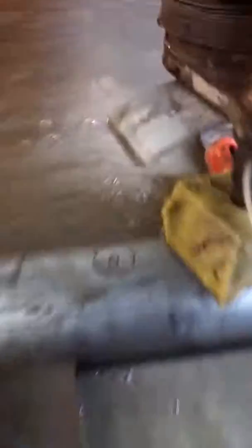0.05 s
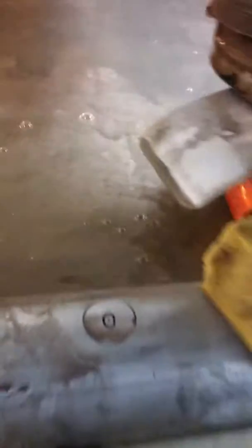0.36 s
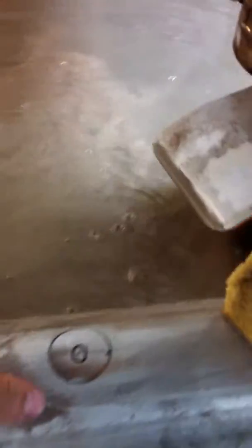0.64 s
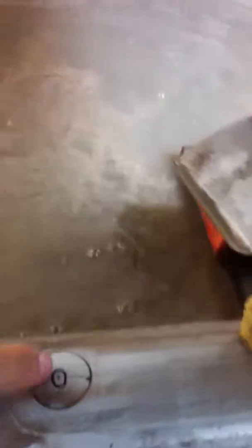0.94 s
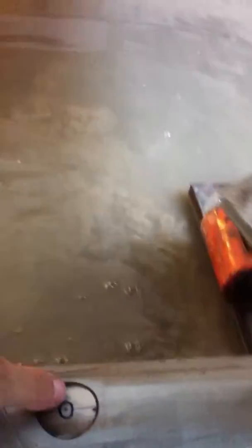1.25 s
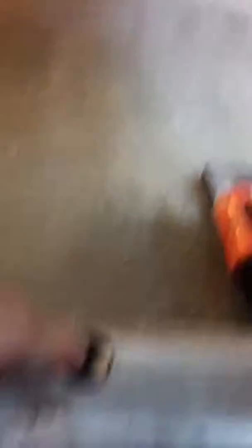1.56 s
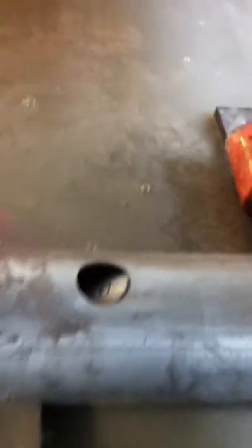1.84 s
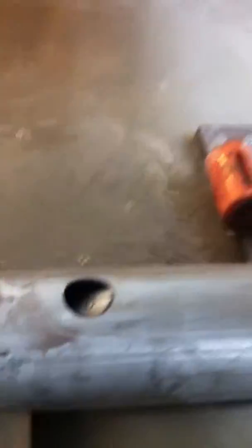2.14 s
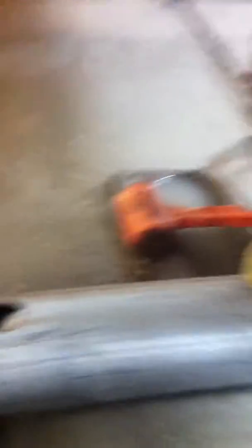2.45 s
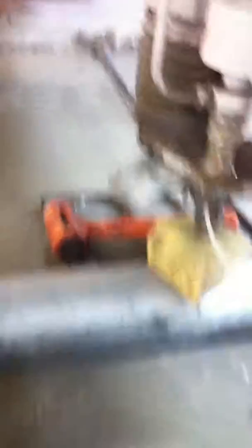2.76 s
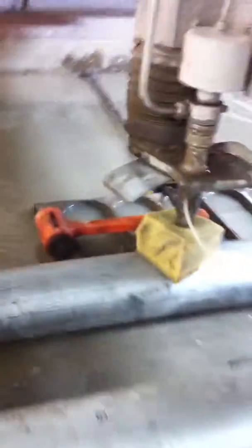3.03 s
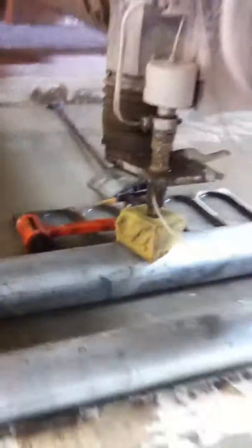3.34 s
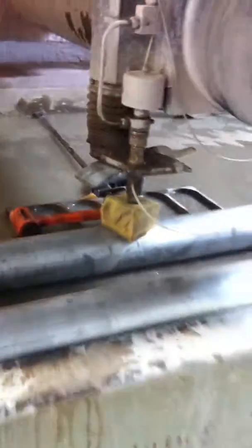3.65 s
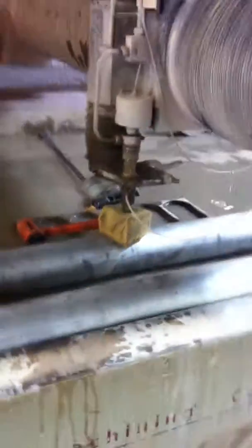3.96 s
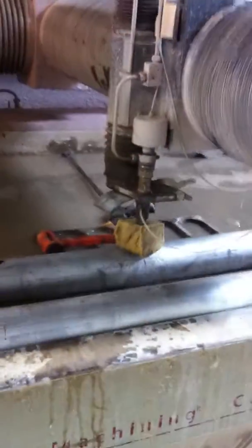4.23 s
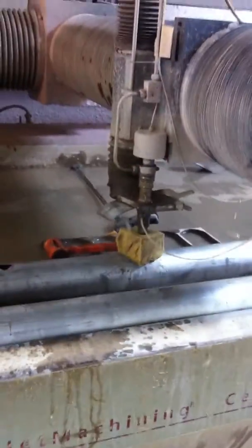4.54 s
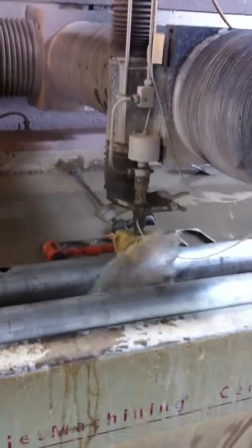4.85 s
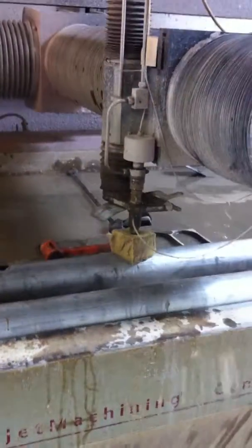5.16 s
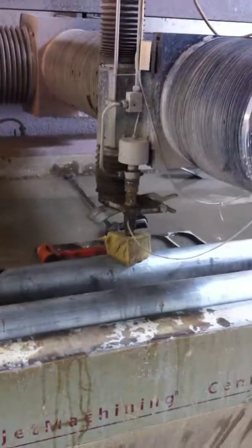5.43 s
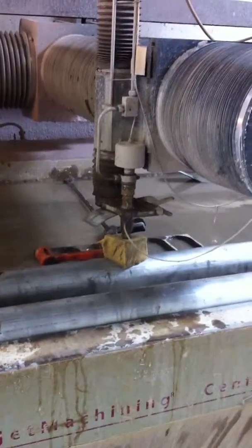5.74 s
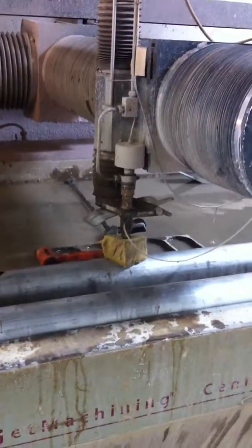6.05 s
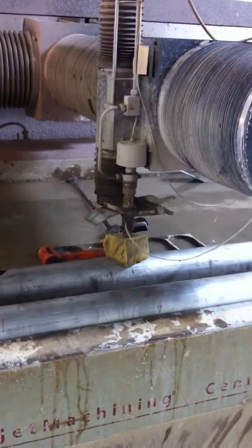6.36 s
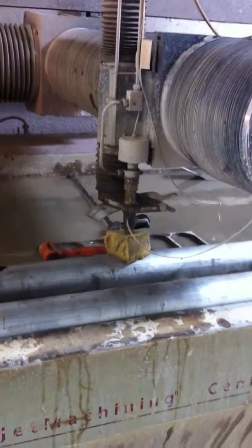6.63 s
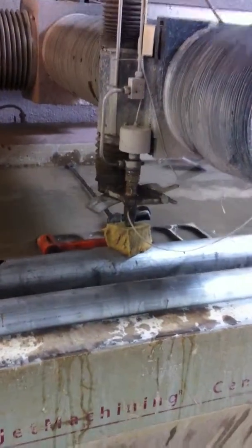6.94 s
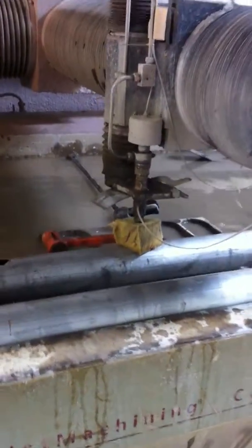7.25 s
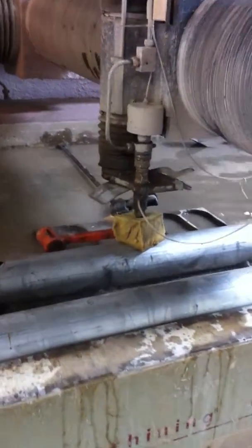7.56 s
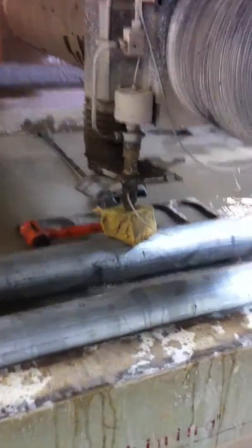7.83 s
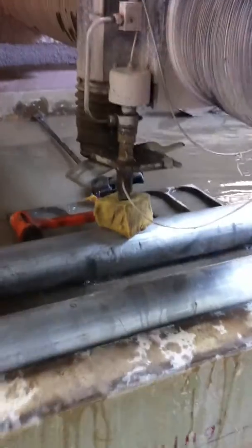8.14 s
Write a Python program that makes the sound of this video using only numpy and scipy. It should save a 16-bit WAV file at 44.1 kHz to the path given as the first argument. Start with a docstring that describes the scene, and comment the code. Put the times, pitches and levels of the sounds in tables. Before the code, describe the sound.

A high-pressure pump drones with a wavering whine over workshop rumble and a thin hiss of air. About halfway through, a water jet starts with a sharp spit and a low gulp from the tank. It hisses brightly on a steel tube, breaks through with a splashy rush and keeps cutting, with shifting whistles, hollow ringing and crackling spits. The microphone moves about close to the machine.

```python
"""A workshop with a waterjet table, heard from a hand-held microphone that moves about in front of it.
The high-pressure pump drones and whines over a bed of shop rumble and air. Then the valve opens: the
jet hisses on a steel tube, pierces its wall, churns the tank below and cuts on, spitting into the
hollow tube, which rings. An automatic gain control ducks the whole mix under the jet."""
import sys
import numpy as np
from scipy import signal
from scipy.fft import rfft, irfft, next_fast_len
from scipy.io import wavfile
from scipy.ndimage import uniform_filter1d

SR = 44100
rng = np.random.default_rng(int(sys.argv[2]) if len(sys.argv) > 2 else 0)


def digitize_waveform(pressure):
    """Quantize a signal to 16-bit integers and store it at the path in sys.argv[1].

    Rows of a 2-D input are taken as channels; values are limited to [-1, 1].
    """
    field = np.atleast_2d(pressure).T
    bounded = np.clip(field, -1, 1)
    quanta = np.round(bounded * 32767).astype(np.int16)
    wavfile.write(sys.argv[1], SR, quanta)


N = 366030

SHAFT_HZ = 33.64
VALVE_S, STRIKE_S, PIERCE_S = 4.258, 4.29, 4.852  # cues: valve opens, jet hits steel, wall gives way
LOUD_SPOT_WIDTH_S = 0.67  # the microphone crosses a spot where the machine tones pile up in the room


def from_db(db):
    """Decibels to gain."""
    return 10 ** (np.asarray(db) / 20)


def rms_one(x):
    """Scale to an rms of 1."""
    return x / np.sqrt(np.mean(np.abs(x) ** 2) + 1e-20)


def seconds():
    """The time of every sample."""
    return np.arange(N) / SR


def automation(rows):
    """Breakpoints (t/s, values...) to one curve per value column."""
    times, *columns = np.transpose(rows)
    return [np.interp(seconds(), times, column) for column in columns]


def swell(at_s, width_s):
    """A bell-shaped envelope around a moment; the width is its standard deviation."""
    return np.exp(-.5 * ((seconds() - at_s) / width_s) ** 2)


def dying(from_s, decay_s):
    """Full until a moment, then an exponential decay."""
    return np.exp(-np.maximum(seconds() - from_s, 0) / decay_s)


def drift(rate_hz):
    """Smooth random modulation with a spread of 1."""
    step, run_in = 40, 2000
    pole = np.exp(-2 * np.pi * rate_hz * step / SR)
    white = rng.standard_normal(N // step + run_in + 2)
    slow = signal.lfilter([1], [1, -2 * pole, pole * pole], white)[run_in:]
    return np.interp(np.arange(N) / step, np.arange(len(slow)), rms_one(slow))


def sputter(spread_db):
    """The quick flutter of a turbulent flow, as a gain."""
    return from_db(spread_db * drift(28))


def at_hz(spectrum, hz):
    """Read a spectrum (f/Hz, level/dB) on a log-frequency axis."""
    known_hz, db = np.transpose(spectrum)
    return np.interp(np.log(np.maximum(hz, 1)), np.log(known_hz), db)


def noise(spectrum):
    """Steady noise of a given colour, rms 1."""
    size = next_fast_len(N)
    colour = from_db(at_hz(spectrum, np.arange(size // 2 + 1) * SR / size))
    return rms_one(irfft(rfft(rng.standard_normal(size)) * colour, size)[:N])


def resonance(hz, width_hz):
    """A resonance excited by turbulence, rms 1."""
    r = np.exp(-np.pi * width_hz / SR)
    poles = [1, -2 * r * np.cos(2 * np.pi * hz / SR), r * r]
    return rms_one(signal.lfilter([1, 0, -1], poles, rng.standard_normal(N)))


def whistle(hz, width_hz):
    """Turbulence through the same resonance twice, for steep skirts; rms 1."""
    r = np.exp(-1.55 * np.pi * width_hz / SR)
    section = [1, 0, -1, 1, -2 * r * np.cos(2 * np.pi * hz / SR), r * r]
    return rms_one(signal.sosfilt([section, section], rng.standard_normal(N)))


def room_tone(cycles, diffuse=0.4):
    """A steady direct tone plus reflections that fade in and out as the listener moves; rms about 1."""
    angle = 2 * np.pi * (cycles + rng.random())
    in_phase = (np.sqrt(2) + diffuse * drift(1.3)) * np.cos(angle)
    return in_phase + diffuse * drift(1.3) * np.sin(angle)


def shop(rumble_db=-35.0, air_db=-43.5, air_rise_db_per_s=0.63):
    """The bed: reverberant machine rumble, a thin, growing hiss of air and a small leak's sizzle."""
    # noise colours: f/Hz, level/dB
    rumble_colour = [(20, -43), (55, -35), (85, -20), (110, -6), (165, 1), (215, 7), (255, -1), (295, -0.5),
                     (360, -7.5), (490, 1.5), (580, -0.5), (700, 0), (1000, -2.5), (1400, -2), (1800, -8),
                     (2600, -22)]
    air_colour = [(1200, -11), (2200, 5), (2450, 3.5), (2700, 6), (2900, 4.5), (3150, 6), (3600, 6.5),
                  (4000, 2.5), (4470, 6), (5000, 1), (5300, 3.5), (5850, 0), (6500, 2), (6950, 4),
                  (7500, 1), (8800, 2), (10000, -7), (12500, -9), (14500, -31), (15400, -27), (17000, -29)]
    leak = from_db(-6.0 + 2.0 * drift(6.7)) * resonance(hz=8730, width_hz=920)
    air = sputter(spread_db=0.6) * noise(air_colour) + leak
    air_gain = from_db(air_db + air_rise_db_per_s * seconds())
    return from_db(rumble_db) * noise(rumble_colour) + air_gain * air


def motor():
    """A second motor whose lowest tone beats against the pump."""
    # motor tones: f/Hz
    tones = [272, 817, 1234, 1635]
    # each peaks at its own place in the loud spot: level/dB, boost/dB, t/s
    levels = [(-47, 5.5, 3.56), (-57, 12.5, 3.4), (-53.5, 9, 2.9), (-55.5, 1, 2.5)]
    out = 0
    for hz, (db, boost_db, at_s) in zip(tones, levels):
        gain = from_db(db + boost_db * swell(at_s, LOUD_SPOT_WIDTH_S))
        out += gain * room_tone(hz * seconds(), diffuse=0.11)
    return out


def plunger_hum(turns, base_db=-43.5, sixth_db=-47.5):
    """The drone of the plunger strokes; order 6 stands in the room and swells twice along the walk."""
    # strong orders: multiple of the shaft rate, level/dB
    orders = [(2, -31), (3, -18.5), (5, -12), (6, 1), (8, -6), (9, -5.5), (16, -7.5), (19, -5.5), (20, -9)]
    standing_db = sixth_db + 7.5 * swell(3.2, LOUD_SPOT_WIDTH_S) + 6.4 * swell(6.3, 0.85)
    return sum(from_db(db + (standing_db if order == 6 else base_db)) * room_tone(order * turns)
               for order, db in orders)


def drive_whine(turns):
    """The drive's speed wobbles on each turn, giving its whine opposed sidebands; reverb adds a wash."""
    # lower sideband, whine, upper sideband: multiples of the shaft rate
    orders = [39, 40, 41]
    # their balance along the walk: t/s, lower/dB, whine/dB, upper/dB, wash/dB
    walk = [(0, -53, -54, -58, -58), (.33, -39.5, -43, -45, -43), (.8, -37, -41, -47, -49),
            (1.3, -41.5, -44.5, -50, -45), (1.9, -53, -43, -41.5, -43), (2.35, -40, -46, -55, -50),
            (2.62, -51, -47, -56, -51), (2.85, -54, -44, -50, -41), (3.3, -55, -52, -54, -40),
            (4.2, -51, -44, -51, -45), (6.0, -60, -59, -56, -56), (8.3, -30, -43, -42, -37)]
    *lines_db, wash_db = automation(walk)
    lines = sum(sign * from_db(db) * np.cos(2 * np.pi * order * turns)
                for order, sign, db in zip(orders, (-1, 1, 1), lines_db))
    return np.sqrt(2) * lines + from_db(wash_db) * resonance(hz=1357, width_hz=88)


def casing_rattle(turns, size=4096):
    """The same rattle on every turn of the shaft; two paths through the room trade places slowly."""
    # envelope of the weak orders that shake the casing: f/Hz, level/dB
    colour = [(130, -65.5), (400, -56), (600, -65), (900, -58), (1250, -59), (1500, -84), (2000, -62)]
    orders = np.arange(4, 60)
    gains = from_db(at_hz(colour, orders * SHAFT_HZ))
    out, blend = 0, drift(0.43)
    for weight in (np.cos(blend), np.sin(blend)):
        lines = np.zeros(size // 2 + 1, complex)
        lines[orders] = gains * np.exp(2j * np.pi * rng.random(len(orders)))
        one_turn = irfft(lines) * size / np.sqrt(2)
        out += weight * np.interp(turns % 1, np.arange(size) / size, one_turn)
    return out


def pump():
    """Hum, whine and rattle, all locked to one slightly unsteady shaft."""
    turns = np.cumsum(SHAFT_HZ * (1 + .0004 * drift(1.5))) / SR
    return plunger_hum(turns) + drive_whine(turns) + casing_rattle(turns)


def tank(trim_db=2.5):
    """The jet drives air under water and the tank gulps in short, low swells."""
    # gulps: t/s, width/s, level/dB
    gulps = [(4.29, 0.0058, -33), (4.395, 0.025, -18), (4.902, 0.027, -36), (4.984, 0.034, -37),
             (5.3, 0.17, -44.5), (5.362, .01, -36)]
    # churning water: f/Hz, level/dB
    colour = [(25, -34), (70, -18), (130, -7), (200, 5.5), (280, -1), (400, 1), (800, -6), (1500, -10),
              (3000, -36)]
    envelope = sum(from_db(db) * swell(at_s, width_s) for at_s, width_s, db in gulps)
    return from_db(trim_db) * envelope * noise(colour)


def flow(wander_db=0.36):
    """Jet strength in dB: it flares on fresh steel, chokes in its own slot and wanders slightly."""
    # flares: t/s, width/s, boost/dB
    flares = [(4.29, 0.011, 1.1), (4.433, 0.012, 1.5), (4.867, 0.0062, 0.5), (5.333, 0.081, 0.8),
              (5.897, 0.023, 1.8), (6.423, 0.019, 2.2), (7.24, 0.02, 1), (7.786, 0.01, 3),
              (7.988, 0.011, 2.5), (8.172, 0.023, 0.7)]
    # chokes: t/s, width/s, cut/dB
    chokes = [(4.474, 0.015, 2.5), (4.677, 0.057, 9), (5.115, 0.058, 3.5), (7.033, 0.16, 2),
              (7.303, 0.046, 1.7), (7.703, 0.014, 1), (7.82, 0.024, 2.5), (8.06, 0.041, 3.5)]
    boost_db = sum(db * swell(at_s, width_s) for at_s, width_s, db in flares)
    cut_db = sum(db * swell(at_s, width_s) for at_s, width_s, db in chokes)
    return boost_db - cut_db + wander_db * drift(3.1)


def piercing(attack_s=0.007, hold_s=0.25, release_s=0.11):
    """Envelope of the sudden rush as the wall gives way, 0-1."""
    return np.clip((seconds() - PIERCE_S) / attack_s, 0, 1) * dying(PIERCE_S + hold_s, release_s)


def accents(strike_db, settle_s, pierce_db):
    """What the first strike on the unbroken wall and the piercing add to a level, in dB."""
    return strike_db * dying(STRIKE_S, settle_s) + pierce_db * piercing()


def jet_levels(runoff_db=-39.5):
    """Level rides in dB for hiss, tube ring and splash: what rings in the bore hisses less."""
    # spray that gets through the slot into the bore: t/s, level/dB
    bore_spray = [(5.2, -25), (5.4, -28.5), (6.1, -28), (6.5, -23), (7.08, -20.5), (7.2, -19.5),
                  (7.55, -20)]
    # water that falls on into the tank once the wall is open: t/s, level/dB
    spill = [(5.15, -37), (5.4, -35.5), (6.24, -43), (6.43, -34.5), (6.54, -37.5), (7.75, -32)]
    bore_db, = automation(bore_spray)
    spill_db, = automation(spill)
    through_db, flow_db = bore_db - bore_db.mean(), flow()
    water_db = np.where(seconds() < PIERCE_S, runoff_db, spill_db)
    bite_db = 3.5 * piercing(hold_s=0.04, release_s=.014)  # breaking through throws a hard splash
    hiss_db = flow_db - 0.079 * through_db + accents(strike_db=3.5, settle_s=0.057, pierce_db=1.2)
    ring_db = flow_db + through_db + accents(strike_db=7.0, settle_s=0.0095, pierce_db=4.5)
    splash_db = flow_db + water_db + accents(strike_db=13.0, settle_s=0.057, pierce_db=10.0)
    return hiss_db, ring_db, splash_db + bite_db


def splash(ride_db, trim_db=9.5):
    """Water runs off the tube or falls through it into the tank."""
    # splash: f/Hz, level/dB
    colour = [(25, -50), (70, -50), (150, -4), (430, -4.5), (560, -3), (780, 1), (1250, 1.5), (1550, 0),
              (2300, -13)]
    return from_db(ride_db + trim_db) * noise(colour)


def tube_modes(wander_db=1.85):
    """As the spray wanders in the bore it favours one resonance, then another; rms 1."""
    # resonances across the bore: f/Hz
    pitches = [1730, 2170, 2400, 2570, 2740, 3030, 3640, 3830, 4055, 4270, 4540, 5090]
    # how each rings: bandwidth/Hz, level/dB
    rings = [(130, -7), (170, -3.5), (170, -2.5), (110, -5), (160, -3), (110, -2.5), (160, -3), (90, -6),
             (70, -5.5), (140, -6), (130, -8.5), (110, -12)]
    return rms_one(sum(from_db(db + wander_db * drift(4)) * whistle(hz, width_hz)
                       for hz, (width_hz, db) in zip(pitches, rings)))


def tube_ring(ride_db, modes, spray_db=-17.5, modes_db=-18.5):
    """Spray rushes inside the hollow tube and sets it ringing."""
    # spray in the bore: f/Hz, level/dB
    colour = [(100, -56), (1200, -10.5), (1600, -8), (1720, -8), (1900, 1), (2150, 3), (2800, -0.5),
              (3350, 4.5), (3750, -1), (4400, 0.5), (5500, 2), (8000, -12)]
    return from_db(ride_db) * (from_db(spray_db) * noise(colour) + from_db(modes_db) * modes)


def slot_song(trim_db=6.0):
    """As the slot grows, the jet makes one resonance sing after another."""
    # whistles: t/s, width/s, f/Hz, bandwidth/Hz, level/dB
    notes = [(4.305, 0.029, 3350, 800, -20), (4.347, .057, 10400, 900, -19.5), (4.36, .056, 6800, 800, -21),
             (4.39, 0.051, 3300, 250, -29), (4.6, 0.12, 4870, 140, -32), (4.86, 0.04, 4450, 260, -20),
             (4.922, 0.068, 2300, 200, -24), (4.982, 0.042, 510, 219, -25), (5, 0.026, 2000, 420, -18.5),
             (4.97, 0.082, 3400, 220, -29), (5.24, 0.14, 2010, 110, -31), (5.298, 0.15, 3330, 200, -28),
             (5.47, 0.11, 4640, 170, -28.5), (5.45, .12, 4910, 110, -30), (5.6, 0.33, 5840, 130, -31),
             (5.62, 0.12, 10100, 160, -38), (5.85, 0.26, 2310, 200, -33), (5.9, .27, 3600, 220, -32),
             (5.88, 0.063, 6130, 230, -29), (5.9, .09, 7750, 130, -27), (5.95, .25, 5140, 130, -34),
             (6.1, 0.78, 6020, 150, -28), (6.2, .09, 6130, 150, -37), (6.2, 0.74, 6280, 220, -27),
             (6.3, .3, 9300, 200, -32), (6.3, .12, 11000, 150, -37.5), (6.42, .08, 7400, 180, -27),
             (6.548, 0.11, 4270, 130, -27), (6.75, 0.091, 2320, 302, -34), (6.804, 0.14, 3100, 240, -31),
             (7.1, 0.1, 11000, 130, -35), (7.177, 0.034, 2160, 220, -27.5), (7.36, 0.084, 2620, 200, -31),
             (7.55, .07, 2440, 119, -27), (7.8, 0.12, 2990, 90, -27), (8.0, 0.22, 4300, 170, -36),
             (8.0, .3, 6750, 300, -30), (8.07, 0.2, 3050, 65, -33), (8.227, .012, 2400, 140, -20.5),
             (8.224, .01, 5270, 260, -22), (8.234, 0.016, 3020, 90, -14)]
    return sum(from_db(db + trim_db) * swell(at_s, width_s) * whistle(hz, width_hz)
               for at_s, width_s, hz, width_hz, db in notes)


def spits(modes):
    """Slugs of water and grit crackle on the steel and ring the bore."""
    # slugs: t/s, width/s, level/dB
    slugs = [(4.281, 0.0077, -8), (4.868, 0.0064, -14), (6.635, 0.016, -25), (6.763, 0.018, -19),
             (6.906, 0.031, -22), (7.19, .025, -20), (7.56, 0.01, -19), (7.727, .007, -15),
             (7.775, 0.0074, -19), (7.992, .009, -11), (8.226, .009, -12.5)]
    # their bright spatter: f/Hz, level/dB
    colour = [(700, -26), (1800, -10), (2500, -2), (4400, -11), (5500, -3), (8000, -1)]
    envelope = sum(from_db(db) * swell(at_s, width_s) for at_s, width_s, db in slugs)
    crackle = rms_one(from_db(3.5 * drift(140)))
    return envelope * crackle * rms_one(noise(colour) + modes)


def wall(peak_db=-18.0, rise_db_per_s=14.0, release_s=.04):
    """The jet digs into the steel, which rings louder as it thins and stops soon after it is pierced."""
    # ring of the thinning wall: f/Hz, level/dB
    colour = [(300, -47), (800, -8.5), (1250, -4), (1420, -2.5), (1700, 4), (2250, -2), (2800, -1),
              (4500, -7), (6000, -15), (9000, -30)]
    level_db = peak_db + rise_db_per_s * np.minimum(seconds() - PIERCE_S, 0)
    return from_db(level_db) * dying(PIERCE_S, release_s) * noise(colour)


def hiss(ride_db, trim_db=-8.0):
    """The bright, fluttering hiss of the free jet on the steel."""
    # free jet: f/Hz, level/dB
    colour = [(100, -56), (1500, -29), (3000, -7), (4600, 1), (5100, -1), (5600, -0.5), (6500, 1.5),
              (7300, 1), (8200, 0.4), (9300, 1.2), (9900, 1.1), (11000, 2.5), (13000, 1.5), (14500, -1),
              (15700, -2.5)]
    return from_db(ride_db + trim_db) * sputter(spread_db=0.48) * noise(colour)


def early_echoes(x, gain=0.15, sway_s=0.0001196, count=10):
    """Echoes off water, tank walls and gantry shift with the hand and comb the hiss finely."""
    t = seconds()
    lags_s = rng.uniform(0.001002, .012, count)
    return x + gain * sum(np.interp(t - lag - sway_s * drift(0.45), t, x) for lag in lags_s)


def hollowed(x):
    """Reflections cancel in passing notches and turn the hiss hollow while the microphone is held further back."""
    # notches: t/s, width/s, f/Hz, bandwidth/Hz, share lost
    notches = [(5.45, 0.21, 3160, 170, .55), (5.8, 0.43, 4300, 170, .55), (5.95, 0.33, 5620, 260, .6),
               (5.9, .3, 6700, 260, 0.35)]
    out = x
    for at_s, width_s, hz, width_hz, share in notches:
        band = signal.lfilter(*signal.iirpeak(hz, hz / width_hz, fs=SR), x)
        out = out - share * swell(at_s, width_s) * band
    return out


def valve():
    """The valve opens, as a gain: a short, soft puff, then the full jet."""
    offsets_s, levels_db = [-.03, .004, .012, .02, .025, .029], [-70, -29, -20, -24, -13, 0]
    return from_db(np.interp(seconds() - VALVE_S, offsets_s, levels_db))


def jet():
    """The jet hisses, rings the tube and falls into the tank; all its layers sputter together."""
    hiss_db, ring_db, splash_db = jet_levels()
    modes = tube_modes()
    rush = hiss(hiss_db) + tube_ring(ring_db, modes)
    song = slot_song()
    water = splash(splash_db)
    gain = valve() * sputter(spread_db=0.5)
    body = hollowed(early_echoes(rush + water + wall()))
    return gain * (body + song + spits(modes))


def scene():
    """The machines behind and the jet close by, the same in both ears."""
    dip = from_db(-6.1 * swell(5.2, 0.079))  # the background dips briefly after the piercing
    machines = dip * (pump() + motor() + shop())
    mix = machines + tank() + jet()
    return np.array([mix, mix])


def gain_control(x, threshold_db=-23.5, slope=0.41, release_db_per_s=4.0):
    """Loud sound ducks the gain at once; it creeps back slowly."""
    level_db = 10 * np.log10(uniform_filter1d(x[0] ** 2, size=700) + 1e-10)
    release_db = release_db_per_s * seconds()
    held_db = np.maximum.accumulate(level_db + release_db) - release_db
    return x * from_db(-slope * np.maximum(held_db - threshold_db, 0))


def record(dry, ceiling=1.8, cutoff_hz=15750):
    """Gain control, soft-clipped peaks, then a steep high cut."""
    rounded = ceiling * np.tanh(gain_control(dry) / ceiling)
    return signal.sosfilt(signal.ellip(12, .1, 90, cutoff_hz, fs=SR, output="sos"), rounded)


dry = scene()
out = record(dry)
digitize_waveform(out)
```